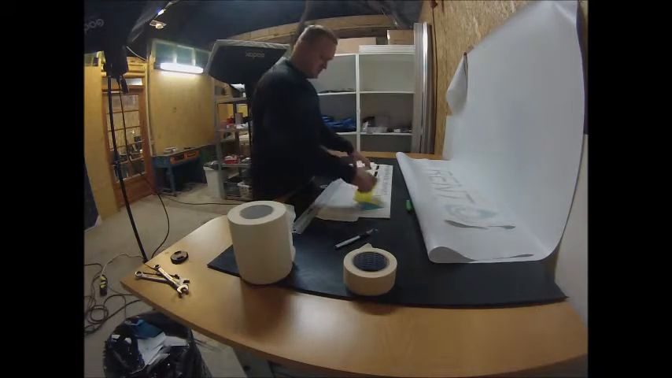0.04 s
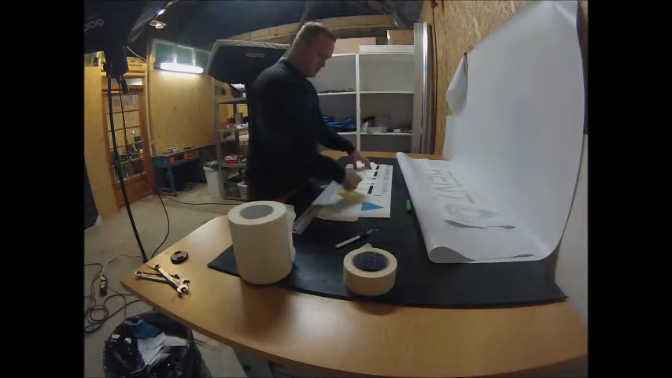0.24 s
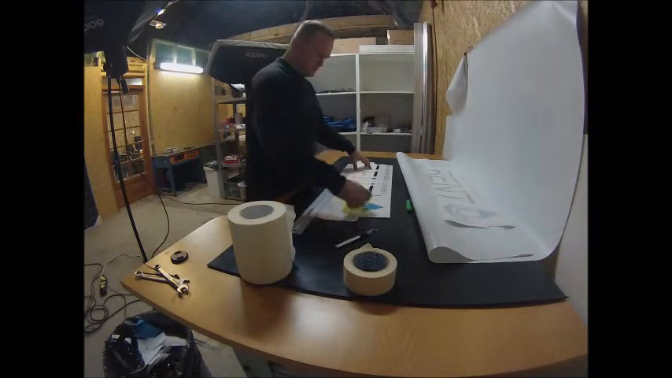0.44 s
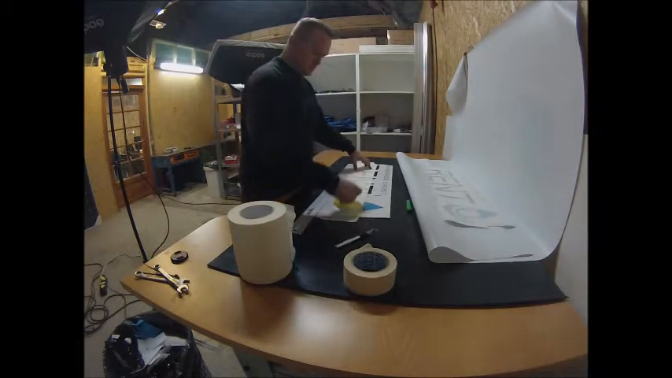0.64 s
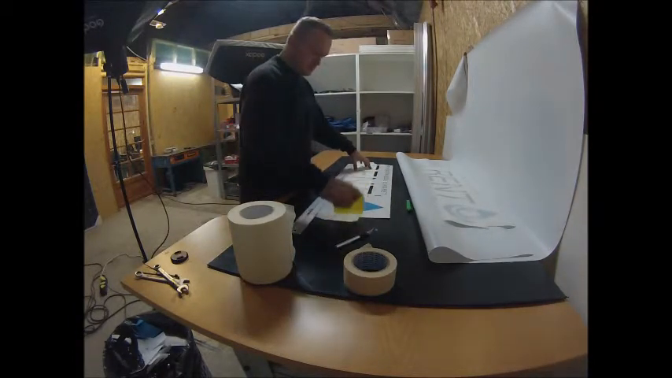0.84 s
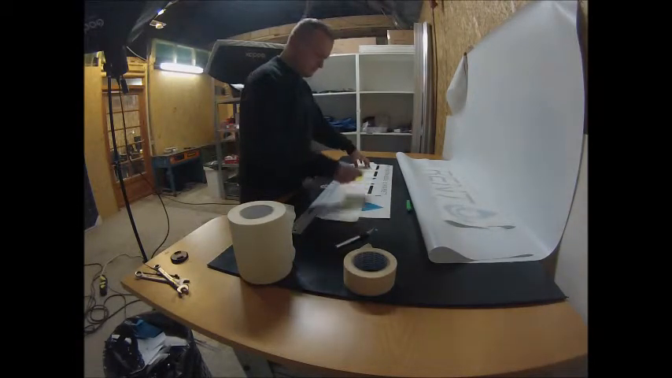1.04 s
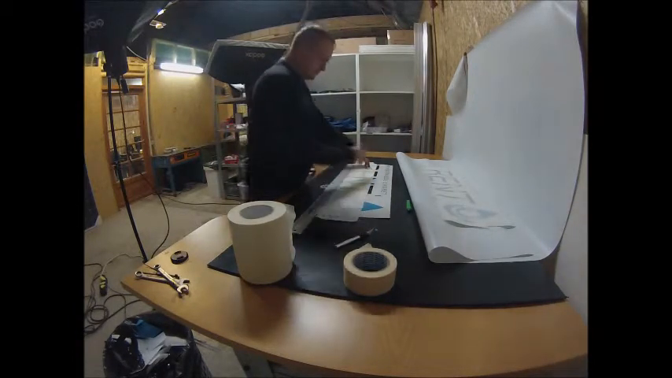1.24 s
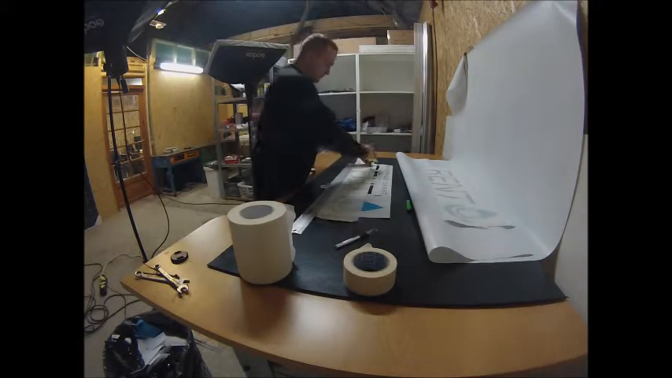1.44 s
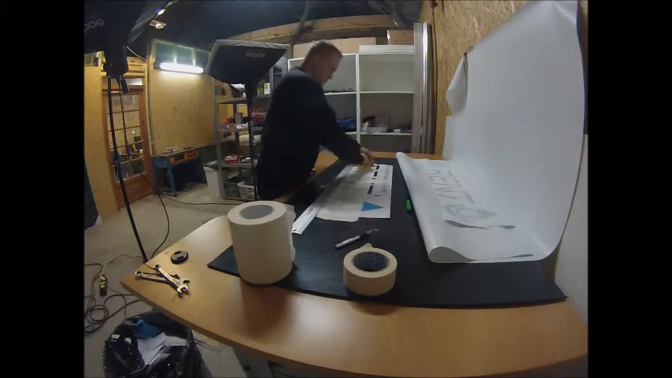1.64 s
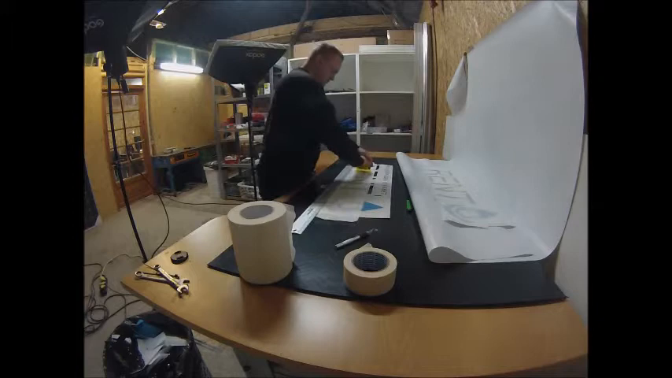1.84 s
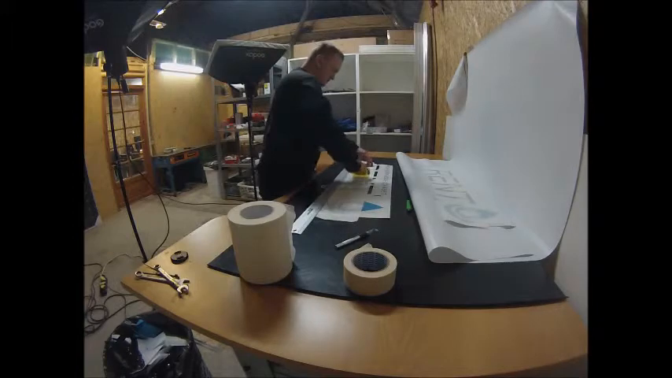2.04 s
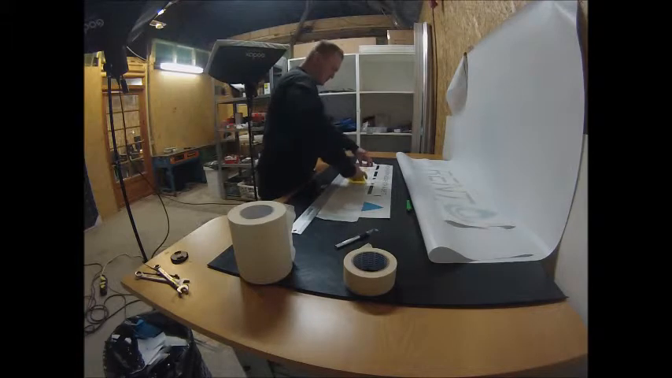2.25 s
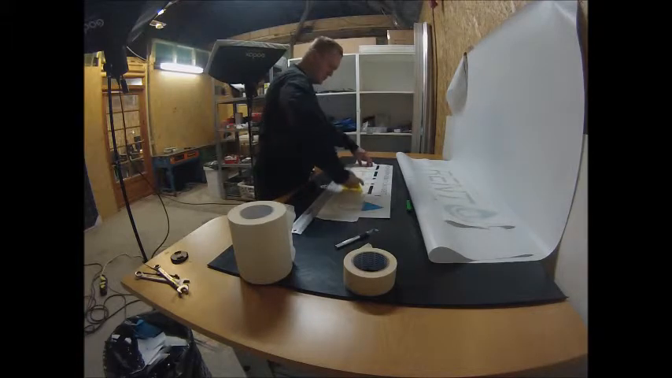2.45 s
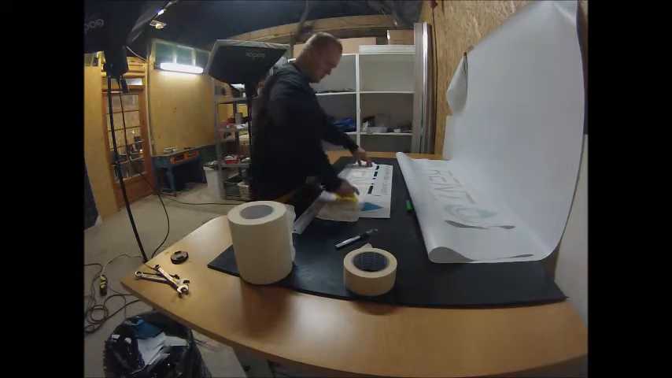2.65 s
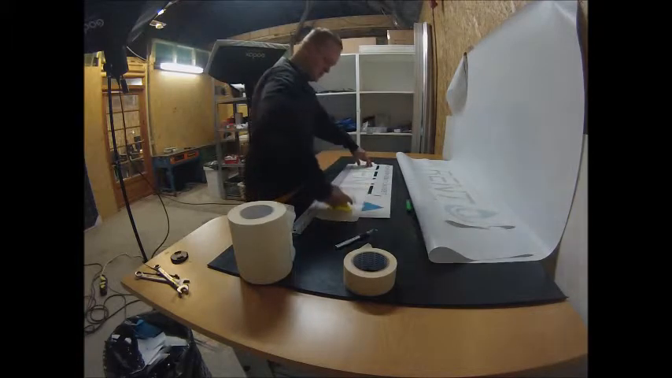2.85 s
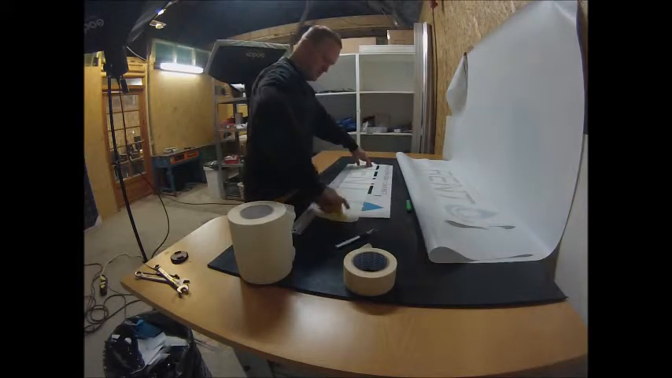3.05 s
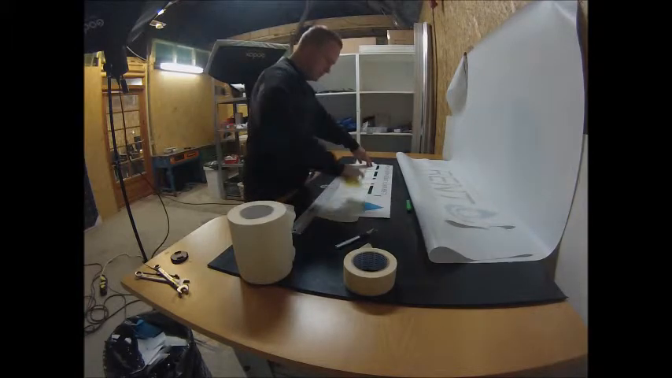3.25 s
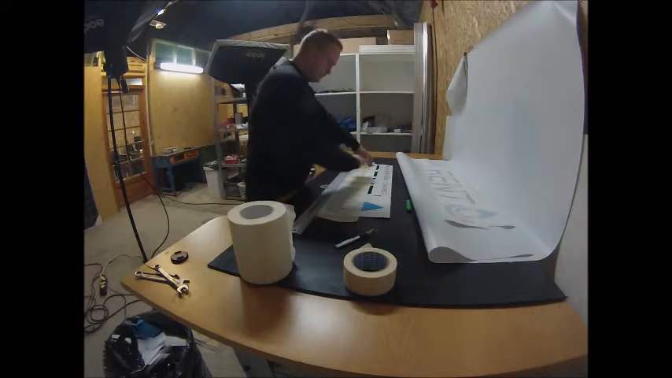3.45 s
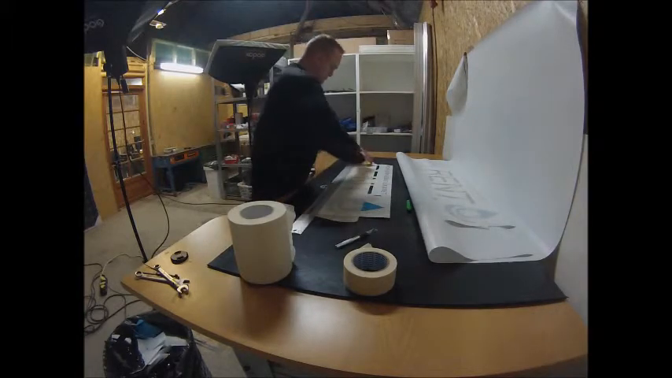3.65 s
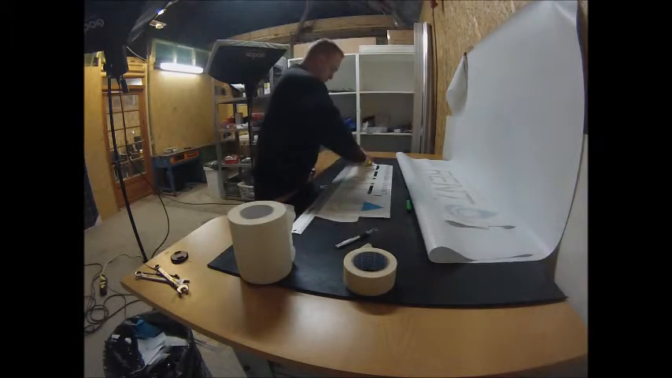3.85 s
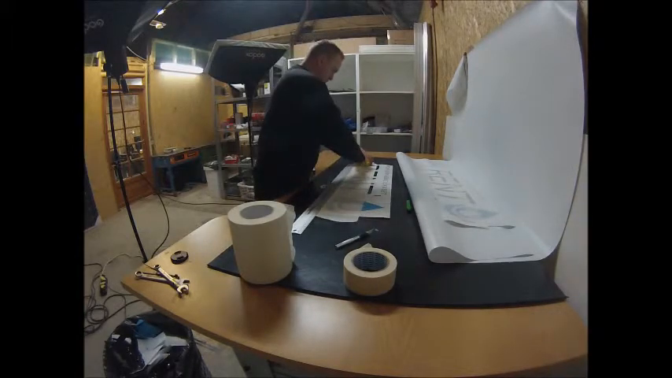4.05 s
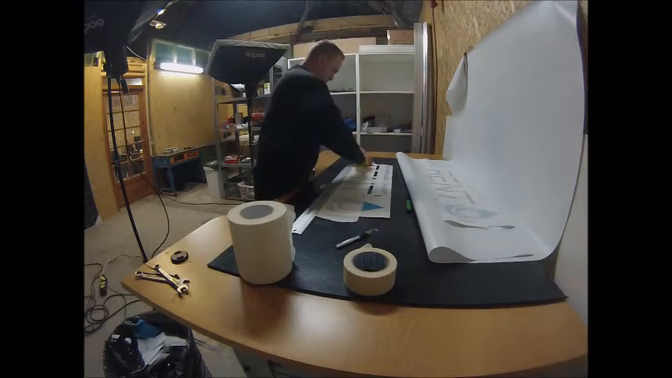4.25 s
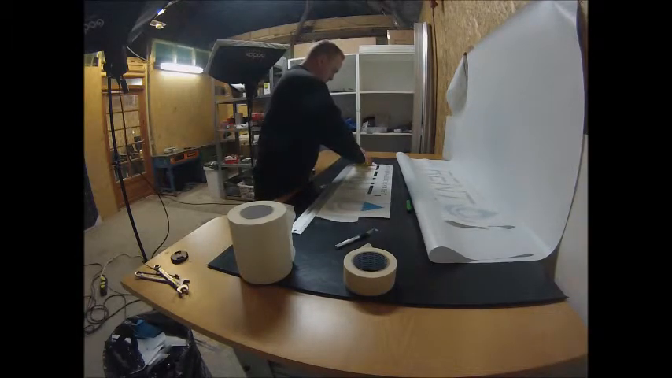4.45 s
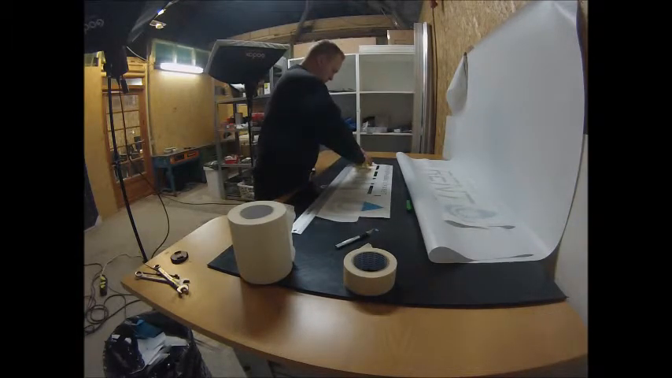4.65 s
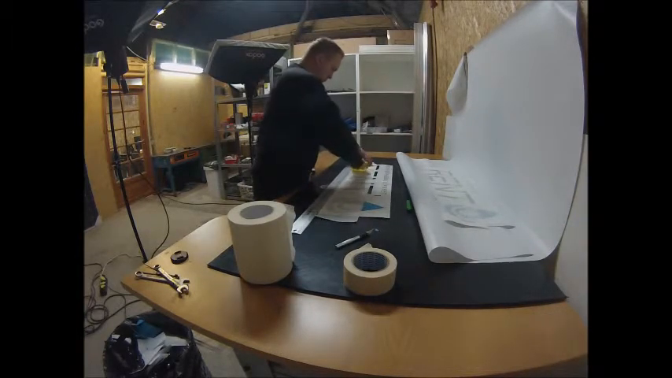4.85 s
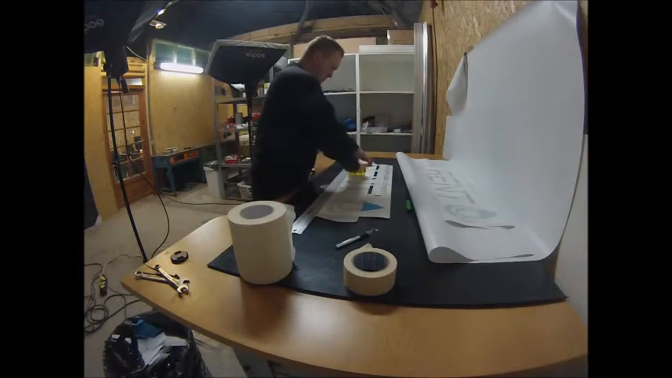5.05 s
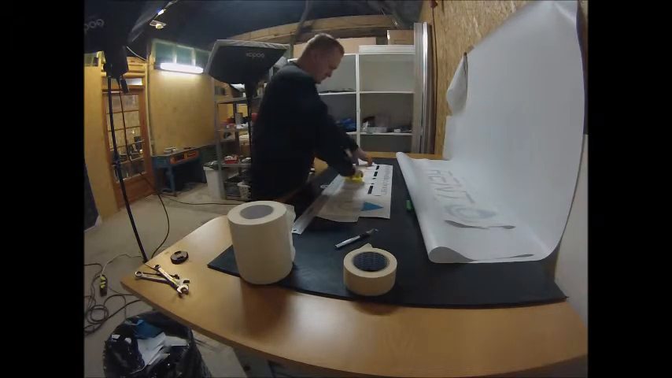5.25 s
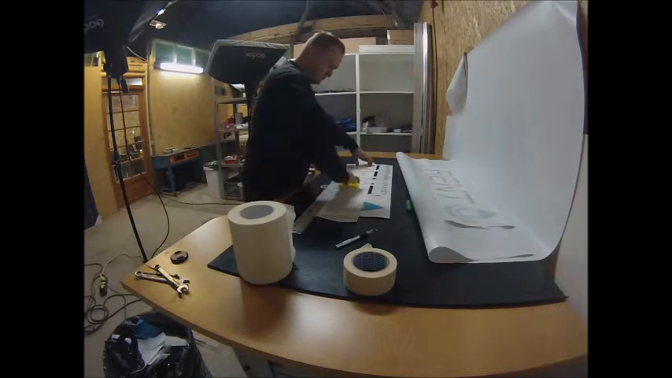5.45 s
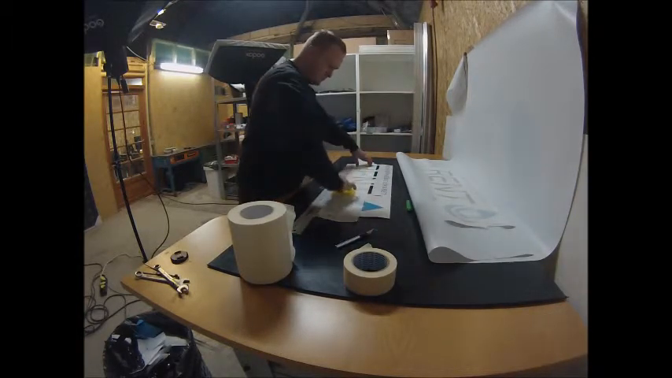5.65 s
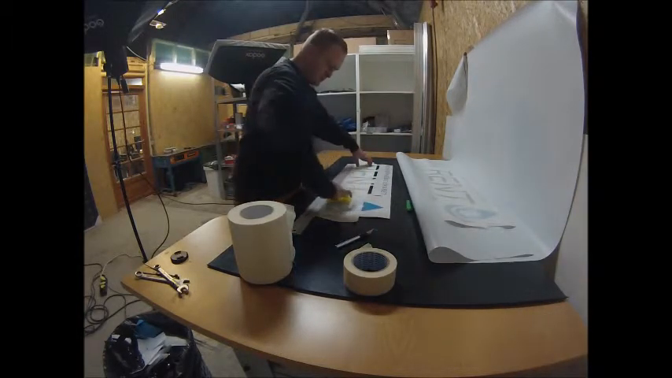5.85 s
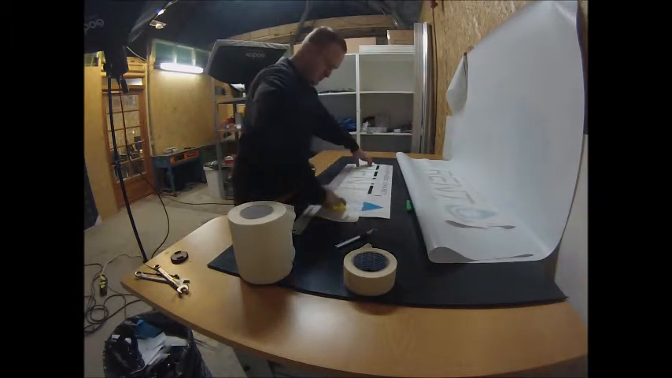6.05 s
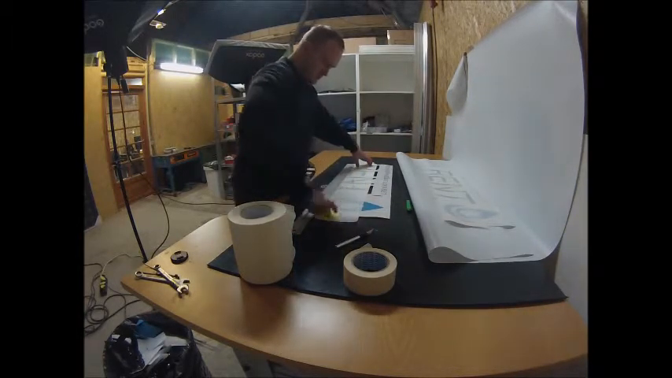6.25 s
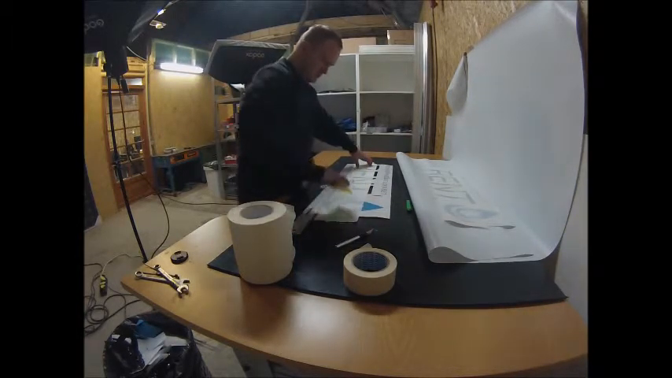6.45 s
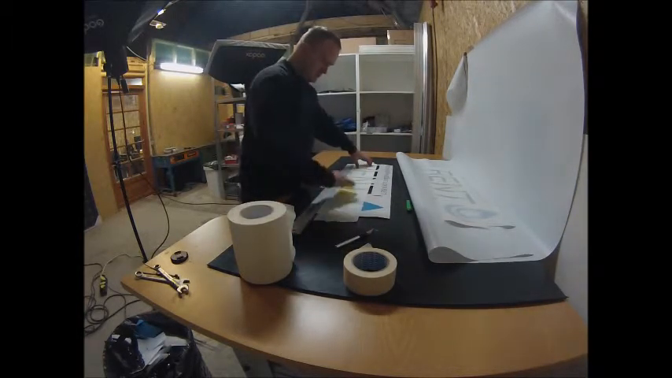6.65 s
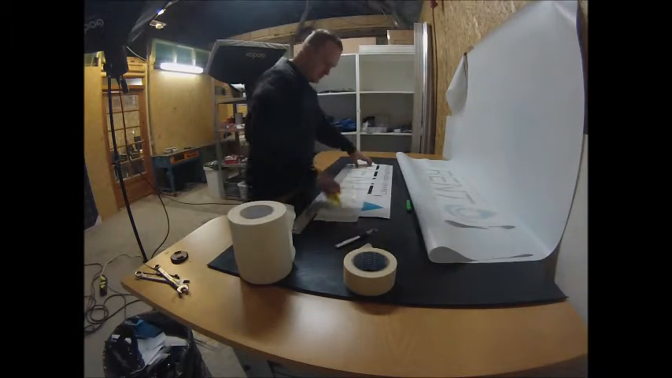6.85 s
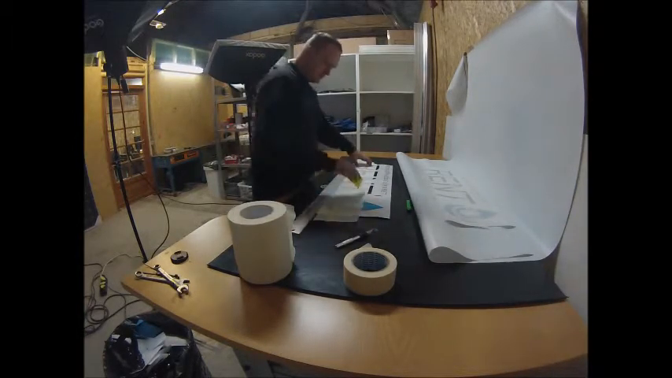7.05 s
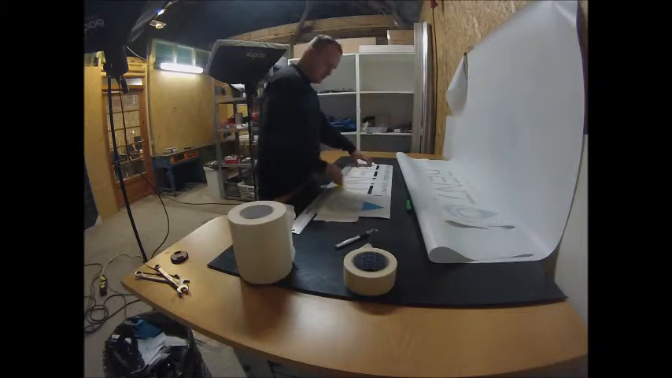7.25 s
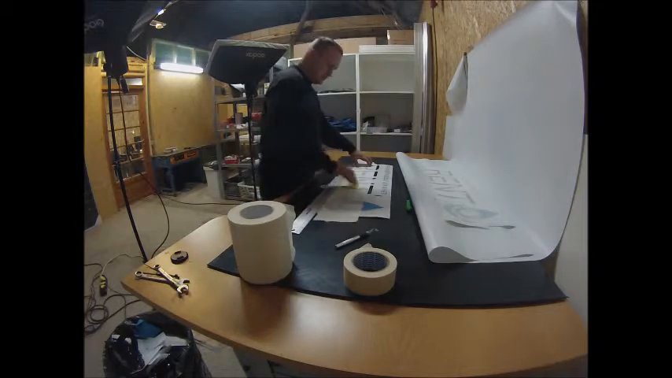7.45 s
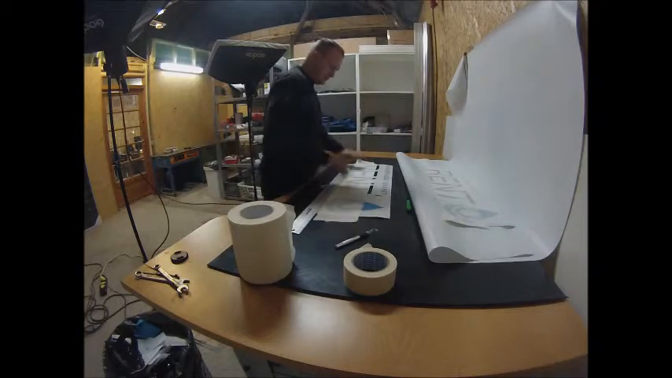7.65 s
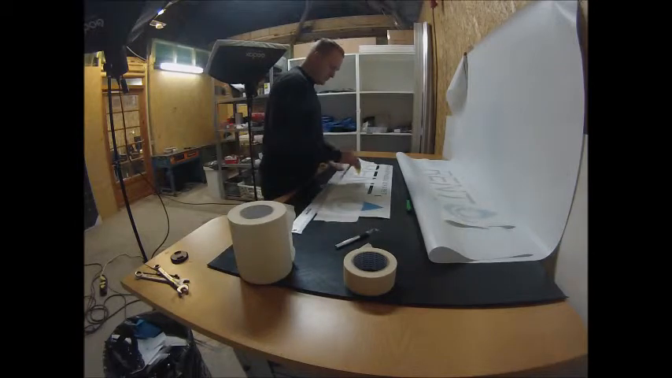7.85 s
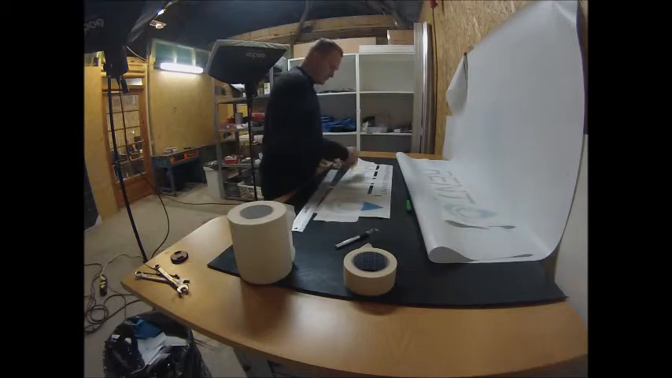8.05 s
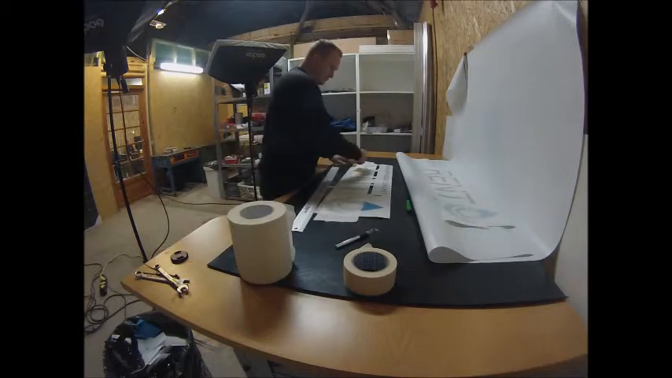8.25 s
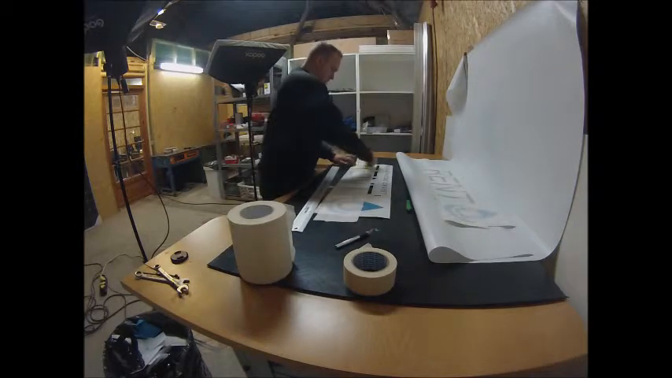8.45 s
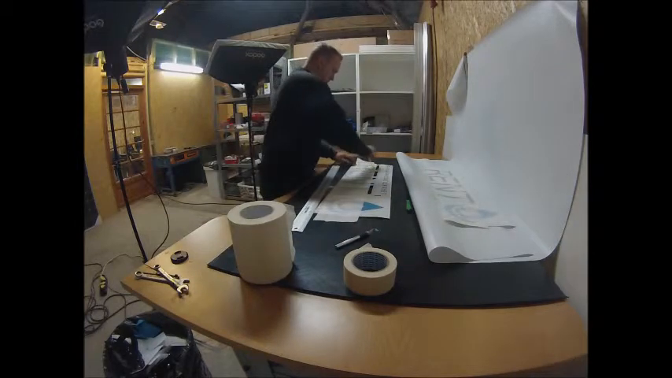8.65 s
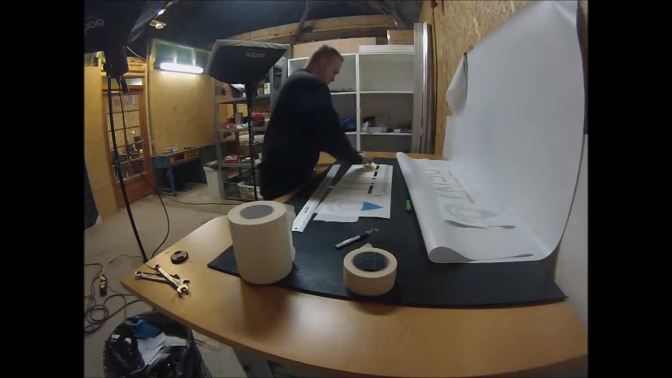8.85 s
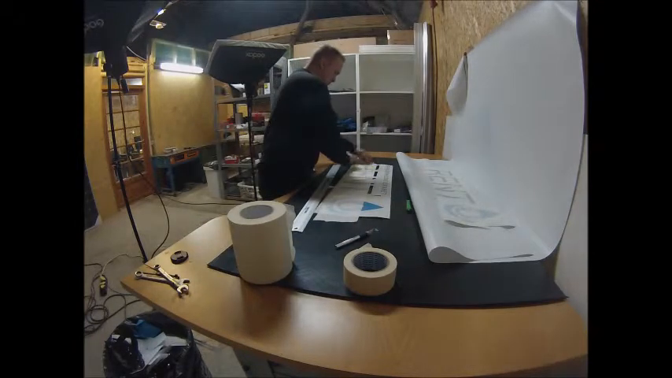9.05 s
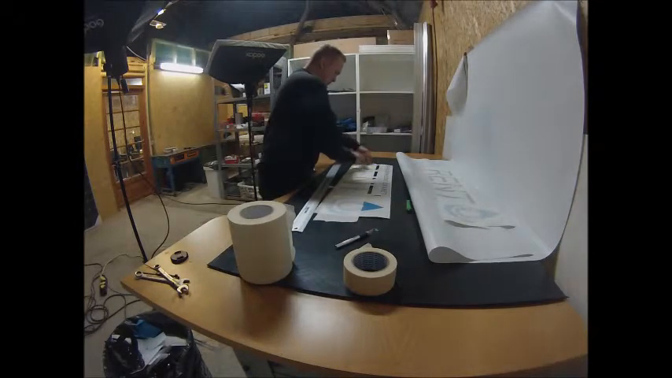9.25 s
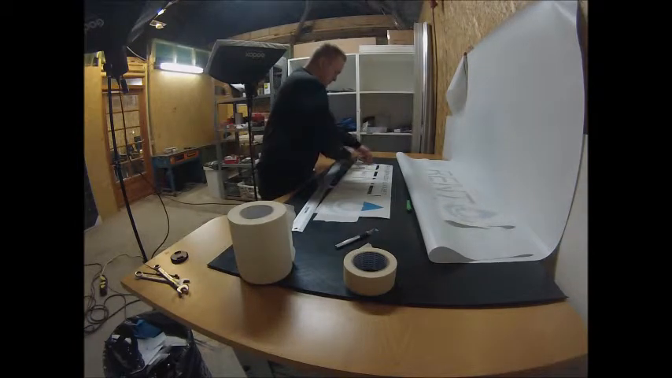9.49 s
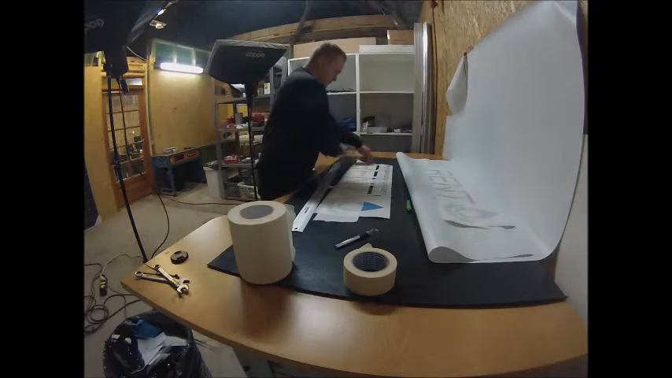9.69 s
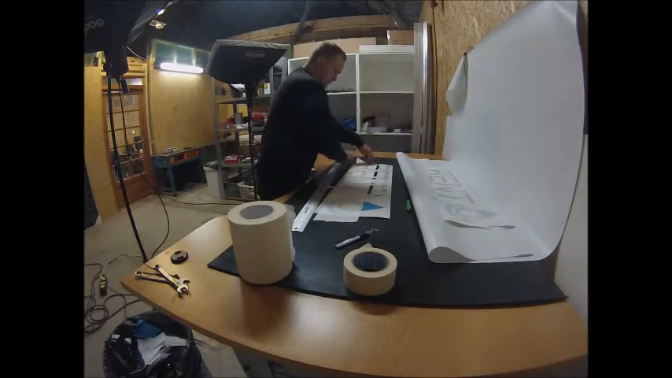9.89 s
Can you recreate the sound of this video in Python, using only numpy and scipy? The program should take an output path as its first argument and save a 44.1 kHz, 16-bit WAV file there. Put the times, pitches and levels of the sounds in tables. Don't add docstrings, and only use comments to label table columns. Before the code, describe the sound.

Small workshop, heard through a single slightly dull, lossy microphone above the bench. A stiff blade knocks down and rasps over plastic film three times quickly, then rubs at length with ringing catches. A quiet gap leads to a gentler long rub that swells at its end. Another sharp swipe, then scattered taps, a damped scrape and final short scuffs with soft bench thuds, over faint fan air and rumble.

```python
import sys
import numpy as np
from scipy import signal
from scipy.fft import rfft, irfft, dct, next_fast_len
from scipy.io import wavfile
from scipy.ndimage import uniform_filter1d, map_coordinates

SR = 44100
rng = np.random.default_rng(int(sys.argv[2]) if len(sys.argv) > 2 else 0)


def makeup_ratio(level_db):
    decades = np.asarray(level_db, float) / 20
    return 10 ** decades


def output_pcm(signal):
    pcm = np.clip(np.atleast_2d(signal).T, -1, 1) * 32767
    wavfile.write(sys.argv[1], SR, np.round(pcm).astype(np.int16))


N = 437472
STEP = 64
PUSH_FROM_DB = -43.5

# (frequency [Hz], width [Hz], level [dB])
STEEP_EDGE = [(2617, 310, -7), (3015, 230, -2.5), (3500, 316, -2), (4216, 230, -4), (4630, 450, -9),
              (5210, 173, -2.5), (5830, 1000, -13.5)]
# (time [s], grip [0 steep and flicked, 1 flat and pressed, 2 flat and light])
HOLD = [(1.5, 0), (1.6, 2), (1.95, 2), (2.3, 1), (3.3, 1), (4, 2), (5, 2), (5.4, 1), (6.5, 1), (6.6, 0)]
# (landing [dB], at speed [dB], after lifting [dB])
BOARD_SHARE_DB = (6, -2.5, -2)
# (landing [dB], at speed [dB], after lifting [dB])
HISS_SHARE_DB = (-17, -9, -21)


def unit(x):
    return x / np.sqrt(np.mean(x ** 2) + 1e-20)


def top(x):
    return x / np.abs(x).max()


def along(points, hz):
    f, v = np.transpose(points)
    return np.interp(np.log(hz + 1), np.log(f + 1), v)


def curves(rows):
    s, *cols = np.transpose(rows)
    return [np.interp(np.arange(N) / SR, s, c) for c in cols]


def wobble(rate):
    knots = rng.standard_normal(int(N * rate / SR) + 4)
    return map_coordinates(knots, [np.arange(N) * rate / SR])


def filtered(x, response):
    m = next_fast_len(len(x) + 8192)
    return irfft(rfft(x, m) * response(np.fft.rfftfreq(m, 1 / SR)), m)[:len(x)]


def modes(table):
    def response(f):
        return sum((-1) ** k * makeup_ratio(db) * 1j * f * w / (c * c - f * f + 1j * f * w)
                   for k, (c, w, db) in enumerate(table))
    return response


def strokes():
    # (start [s], speeding up [s], at speed [s], scrape at lift-off [dB], board share [dB])
    short_strokes = [(-0.06, 0.091, 0.079, -34, -3), (0.34, 0.067, 0.11, -32, -2.5),
                     (0.725, 0.046, 0.082, -31.5, -1), (6.74, 0.033, .11, -35.5, -4),
                     (7.218, 0.015, 0.089, -48.5, 1.5), (7.528, 0.021, 0.077, -48, 2.5),
                     (9.0, 0.077, 0.1, -47.5, -1), (9.338, 0.05, 0.051, -41, 2.5),
                     (9.609, 0.038, 0.048, -40, 0.5), (9.89, 0.044, .05, -45, 7)]
    light_touches = [(1.684, 0.0049, 0.0036, -58, 5.2), (4.15, 0.024, 0.034, -59, 6.2),
                     (4.28, .024, 0.035, -64, 1), (4.43, 0.014, 0.023, -56.5, 7.4),
                     (7.867, .016, 0.049, -59.5, 13.5), (7.99, 0.015, 0.08, -67.5, 15.2)]
    palm_damped = [(8.488, 0.054, 0.034, -39, 2)]
    # (time [s], scrape level [dB], weight on the board [dB])
    long_rubs = [
        [(1.724, -73, 3), (1.76, -48, -5), (1.854, -40.5, -7.5), (1.976, -39, -10.5), (2.11, -44, -3.5),
         (2.486, -42, -4.5), (2.98, -43.5, -2), (3.08, -38.5, -0.5), (3.132, -40, -7)],
        [(4.55, -66, -1), (4.618, -52, -0.5), (4.74, -47.5, -4), (5.29, -44.5, -3.5), (5.772, -44, -3),
         (5.89, -46.5, 2), (6.2, -44, -1.5), (6.306, -38.5, -2), (6.35, -37, -6)],
    ]
    # (frequency [Hz], width [Hz], level [dB])
    board_modes = [(296, 124, -16.5), (427, 56, -10.5), (603, 64, -6.5), (708, 75, -2), (997, 124, 3),
                   (1335, 65, -1.5)]
    # (frequency [Hz], width [Hz], level [dB])
    blade_modes = [(1529, 114, -2.5), (1887, 140, 2)]
    # (frequency [Hz], width [Hz], level [dB])
    pressed_edge = [(2540, 196, -0.5), (3077, 336, 0.5), (3516, 320, 1.5), (4210, 213, -2.5),
                    (4780, 400, -7.5), (5260, 160, -2.5), (5990, 510, -13)]
    # (frequency [Hz], width [Hz], level [dB])
    light_edge = [(2465, 150, -4), (3080, 185, 1.5), (3560, 230, -5), (4110, 300, -5.5), (4670, 280, -4.5),
                  (5200, 310, -4), (6200, 200, -12)]
    # (frequency [Hz], spectral level [dB per Hz])
    grain_hiss = [(3240, -56), (5500, 8.5), (5790, -15), (6630, 3), (10200, -9), (12400, -10.5),
                  (13600, -21), (15500, -23)]

    gains = sum(flick(*row) for row in short_strokes + light_touches)
    gains = gains + sum(flick(*row, free_db=-5) for row in palm_damped)
    gains = gains + sum(rub(rows) for rows in long_rubs)
    gains = uniform_filter1d(gains, size=3, axis=1)
    on_edge, on_board, on_blade, on_grain = [
        np.interp(np.arange(N) / STEP, np.arange(len(g)), g) for g in gains]

    force = drifting(grit(1500, 3.5, share=0.3), patchy_db=2.0)
    judder = wobble(35)
    board = on_board * makeup_ratio(0.9 * judder) * unit(filtered(force, modes(board_modes)))
    blade = on_blade * makeup_ratio(0.92 * judder + 0.44 * wobble(14)) * unit(filtered(force, modes(blade_modes)))

    grip = curves(HOLD)[0]
    edge = 0
    for k, held in enumerate([STEEP_EDGE, pressed_edge, light_edge]):
        edge = edge + np.clip(1 - np.abs(grip - k), 0, 1) * unit(filtered(force, modes(held)))
    edge = on_edge * edge * makeup_ratio(0.6 * judder + 1.1 * wobble(25))

    hiss = unit(filtered(force, lambda hz: makeup_ratio(along(grain_hiss, hz))))
    fine = on_grain * makeup_ratio(0.32 * judder) * hiss
    return makeup_ratio(-1.0) * (board + blade + edge + fine)


def flick(s, rise, hold, db, board_db, free_db=0):
    hard_db = db - PUSH_FROM_DB
    speed_db = db - 0.46 * max(hard_db, -2)
    blade_db = free_db - 0.79 * max(hard_db, -2.5)
    landing = (s, speed_db - 14.5, board_db + BOARD_SHARE_DB[0], blade_db, HISS_SHARE_DB[0])
    at_speed = (s + rise, speed_db, board_db + BOARD_SHARE_DB[1], blade_db, HISS_SHARE_DB[1])
    lifting = (s + rise + hold, db, board_db, blade_db, HISS_SHARE_DB[1])
    return contact([landing, at_speed, lifting], lift_s=0.054)


def rub(rows):
    # (pressed [dB], light [dB])
    blade_share_db = (-4, 0)

    def blade_db(s):
        return np.interp(np.interp(s, *np.transpose(HOLD)), [1, 2], blade_share_db)
    hiss_db = -9.5
    return contact([(s, db, board_db, blade_db(s), hiss_db) for s, db, board_db in rows], lift_s=0.022)


def contact(rows, lift_s):
    s, db, board_db, blade_db, _ = rows[-1]
    lift_db = -16.5 - 0.36 * (db - PUSH_FROM_DB)
    after_s = s + np.cumsum([lift_s, 0.14, 0.2])
    after_db = db + np.cumsum([lift_db, -14.5, -25])
    lifted = (board_db + BOARD_SHARE_DB[2], blade_db - 2, HISS_SHARE_DB[2])
    rows = rows + [(a, b, *lifted) for a, b in zip(after_s, after_db)]

    t = np.arange(0, N + STEP, STEP) / SR
    at, scrape_db, *shares_db = np.transpose(rows)
    touching = (t > at[0]) & (t < at[-1])
    return touching * makeup_ratio([np.interp(t, at, scrape_db + share) for share in [0, *shares_db]])


def grit(per_second, spread_db, share):
    chance, size, sign = rng.random(N), rng.standard_normal(N), rng.standard_normal(N)
    catches = unit((chance < per_second / SR) * makeup_ratio(spread_db * size) * np.sign(sign))
    share = np.clip(share, 0, 1)
    return np.sqrt(1 - share) * rng.standard_normal(N) + np.sqrt(share) * catches


def drifting(x, patchy_db):
    z = signal.stft(x, nperseg=512)[2]
    field = uniform_filter1d(rng.standard_normal(z.shape), size=4, axis=0)
    field = uniform_filter1d(field, size=24, axis=1)
    return signal.istft(z * makeup_ratio(patchy_db * unit(field)), nperseg=512)[1][:N]


def taps():
    # (time [s], peak level [dB], pitch [Hz], thump share [dB], snap share [dB])
    landings = [(0.004, -26.5, 892, -16, -14), (0.325, -28, 596, -5, -4), (0.56, -34, 744, -12, -19),
                (0.703, -24.5, 716, -5.5, -7.5), (1.691, -37, 1027, -13, -6), (3.377, -49.5, 920, -5, 0),
                (4.008, -48, 745, -17, -14), (4.11, -45.5, 890, -15, -11), (6.742, -32.5, 875, -2, -9),
                (7.195, -36, 636, -15, -11), (7.207, -26.5, 907, -10.5, -14),
                (7.51, -23.5, 753, -11.5, -15), (7.873, -38.5, 1110, 3.5, -6), (8.015, -32, 1058, -13, -19),
                (8.457, -32.5, 1027, -11, -9), (8.555, -26.5, 1049, -33, -15),
                (8.572, -26.5, 940, -36, -15), (8.858, -42, 586, -4, -8), (9.32, -22, 625, -7, -9.5),
                (9.59, -28.5, 1052, 0.5, -4.5), (9.868, -26.5, 1028, -0.5, -9),
                (5.292, -30.5, 906, -8.5, -3)]
    chatter_s = 0.0098
    out, t = np.zeros(N + SR), np.arange(SR // 5) / SR
    hold = makeup_ratio(-500 * np.minimum(t, chatter_s) - 1140 * np.maximum(t - chatter_s, 0))
    body = modes([(950, 173, 0.5), (1175, 410, -3.0), (1760, 670, -7.5)])
    low = modes([(260, 160, -3), (420, 120, 0)])
    thin = modes(STEEP_EDGE)

    def padded(f):
        return 1 / (1 + 1j * f / 3200) ** 2

    for s, db, hz, thump_db, snap_db in landings:
        shake = rng.standard_normal((4, len(t)))
        shake[:3, :8] += 1.53 * np.clip((db + 62.5) / 18, 0, 1)
        swing = np.sin(2 * np.pi * hz * t + 0.093 * np.cumsum(shake[3])) * (1 - np.exp(-t / 0.00099))
        knock = swing * hold + 1.08 * top(filtered(shake[0] * hold, lambda f: body(f) * padded(f)))
        thump = top(filtered(shake[1] * hold, lambda f: low(f) * padded(f)))
        snap = top(filtered(shake[2] * hold, lambda f: thin(f) / (1 + 1j * f / 9000)))
        blow = knock + makeup_ratio(thump_db) * thump + makeup_ratio(snap_db) * snap
        out[round(s * SR):][:len(t)] += makeup_ratio(db - 3.5) * blow
    return out[:N]


def snags():
    # (time [s], peak level [dB], pitch [Hz], snap share [dB])
    releases = [(0.107, -28, 1000, -9), (0.119, -24.5, 960, -8), (0.456, -26.5, 1010, -12),
                (0.52, -31, 940, -16), (0.828, -27, 990, -14), (0.84, -22, 990, -14),
                (0.856, -23, 980, -19), (0.864, -21.5, 1390, -3), (2.491, -40, 1560, 10),
                (2.495, -43, 970, 20), (2.541, -35, 942, -11), (2.547, -30.5, 980, -14),
                (2.973, -28, 1220, -14), (2.973, -28.5, 1900, -10), (3.035, -28, 960, -12),
                (3.034, -25, 1700, -8), (3.062, -24.5, 960, -20), (3.082, -33, 921, -11),
                (3.094, -29, 980, -9), (3.13, -33, 1000, -11), (5.677, -29.5, 940, -8),
                (6.344, -26.5, 1010, -9), (6.865, -31, 1860, -5), (8.543, -26, 1050, -15),
                (8.559, -28, 990, -12), (9.359, -24.5, 980, -16)]
    out, t = np.zeros(N + SR), np.arange(SR // 20) / SR
    crisp = modes([(3300, 2500, 0), (7000, 5000, -3)])
    for s, db, hz, snap_db in releases:
        ring = np.sin(2 * np.pi * hz * t) * makeup_ratio(-60 * t / 0.031)
        burst = rng.standard_normal(len(t)) * makeup_ratio(-60 * t / 0.033)
        tick = top(filtered(burst, lambda f: crisp(f) / (1 + 1j * f / 9000)))
        out[round(s * SR):][:len(t)] += makeup_ratio(db - 2.0) * (ring + makeup_ratio(snap_db) * tick)
    return out[:N]


def thuds():
    # (time [s], peak level [dB], pitch [Hz])
    leans = [(0.71, -50, 227), (1.449, -49.5, 135), (1.488, -50, 62), (7.25, -55, 114), (7.51, -43, 82),
             (9.009, -38, 119), (9.047, -40, 101)]
    out, t = np.zeros(N + SR), np.arange(SR // 4) / SR
    for s, db, hz in leans:
        swing = np.sin(2 * np.pi * hz * t) + 0.37 * np.sin(2 * np.pi * 1.9 * hz * t)
        out[round(s * SR):][:len(t)] += makeup_ratio(db + 3 - 60 * t / 0.16) * (1 - np.exp(-t / 0.0012)) * swing
    return out[:N]


def shop(x, wet_db, count=14):
    # (frequency [Hz], time to fall 60 dB [s])
    decay = [(200, 0.59), (1000, 0.27), (3000, 0.33), (6000, 0.23), (12000, 0.24)]
    out, place = x.copy(), np.arange(N) * count / N
    for k in range(count + 1):
        hz, t, z = signal.stft(rng.standard_normal(SR // 2), SR, nperseg=256)
        fall = makeup_ratio(-60 * t / along(decay, hz)[:, None])
        tail = signal.istft(z * fall, SR, nperseg=256)[1]
        tail = np.pad(tail, (150, 0))
        here = np.cos(np.pi / 2 * np.clip(place - k, -1, 1))
        out += makeup_ratio(wet_db) * signal.oaconvolve(here * x, tail / np.linalg.norm(tail))[:N]
    return out


def background():
    # (frequency [Hz], spectral level [dB per Hz])
    air_spectrum = [(12, -16), (20, -0.5), (106, -4), (185, -7.5), (520, -10.5), (1080, -10), (1250, -16),
                    (15000, -38.5)]
    # (time [s], level [dB])
    rumble_level = [(0.0, -63), (0.36, -71.5), (2.9, -68.5), (3.84, -76), (4.17, -65), (4.61, -67),
                    (4.81, -59.5), (5.33, -70), (6.08, -58.5), (6.66, -62.5), (6.93, -60), (7.79, -59.5),
                    (8.59, -66), (9.28, -56), (9.92, -58)]
    # (frequency [Hz], width [Hz], level [dB])
    fan_lines = [(57, 9.2, -69), (545, 6.4, -72), (728, 11.3, -66.5)]

    def noise(response):
        return unit(filtered(rng.standard_normal(N), response))

    air = makeup_ratio(-57 + 1.03 * wobble(9.8)) * noise(lambda hz: makeup_ratio(along(air_spectrum, hz)))
    rumble_db = curves(rumble_level)[0] + 3.5 * wobble(9)
    rumble = makeup_ratio(rumble_db) * noise(modes([(57, 11.5, 5), (110.5, 51, -4)]))
    fan = sum(makeup_ratio(db + 0.47 * wobble(0.98)) * noise(modes([(hz, w, 0)])) for hz, w, db in fan_lines)
    return air + rumble + fan


def scene():
    mono = shop(strokes() + taps() + snags(), wet_db=-8.5) + thuds() + background()
    return np.array([mono, mono])


def starve(x):
    # (time [s], coarseness against the block's mean line [dB])
    coarse_blocks = [(.029, -9), (.647, -6.5), (.795, -7.5), (.946, -3.5), (1.181, -8), (2.674, -5.5),
                     (3.21, -10.5), (3.654, -8), (3.741, -7.5), (4.232, -9), (4.615, -6), (4.659, -4),
                     (4.83, -6.5), (4.998, -7), (5.172, -6), (5.875, -7.5), (5.959, -10), (6.29, 1.5),
                     (6.388, -8), (6.792, -1.5), (7.857, -12), (8.006, -19.5), (7.62, -8.5), (8.092, -13),
                     (8.434, -5), (8.54, -5), (8.586, -2.5), (9.694, -3.5)]
    block = 2048
    out, fade = x.copy(), np.hanning(block) ** 1.2
    hz = np.arange(block) * SR / 2 / block
    for s, coarse_db in coarse_blocks:
        at = round(s * SR) - block // 2
        lines = dct(fade * out[at:at + block], type=4, norm="ortho")
        size = np.sqrt(np.abs(uniform_filter1d(lines ** 2, size=5)))
        mean = np.sqrt(np.mean(lines[block // 40:block // 4] ** 2))
        uneven_db = np.repeat(4 * rng.standard_normal(block // 16), 16)
        step = mean * makeup_ratio(coarse_db - 0.4 * hz / 1000 + uneven_db)
        error = lines - 2 * step * np.round(lines / step / 2)
        lost = np.where(size < step, lines, error)
        out[at:at + block] -= dct(lost, type=4, norm="ortho")
    return out


def thin_top(x, from_hz, share):
    hz, _, z = signal.stft(x, SR, nperseg=1024)
    luck = uniform_filter1d(rng.standard_normal(z.shape), size=3, axis=0)
    luck = unit(uniform_filter1d(luck, size=3, axis=1))
    kept = (luck > share) | (hz[:, None] < from_hz)
    return signal.istft(z * kept, SR, nperseg=1024)[1][:N]


def band_limit(x):
    return signal.sosfilt(signal.butter(12, 15660, fs=SR, output="sos"), x)


def record(dry):
    limited = filtered(dry[0], lambda hz: hz < 15300)
    mono = thin_top(starve(limited), from_hz=12000, share=-0.098)
    return band_limit(np.array([mono, mono]))


dry = scene()
out = record(dry)
output_pcm(out)
```